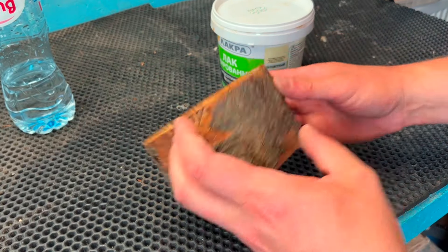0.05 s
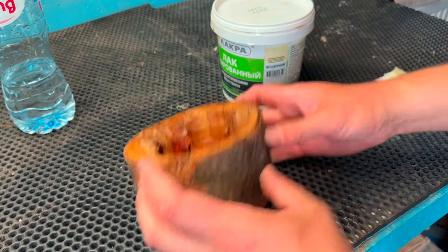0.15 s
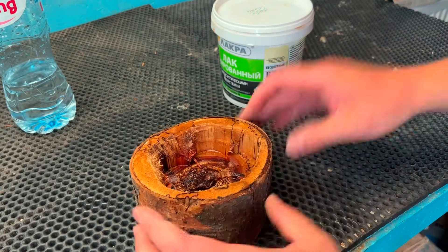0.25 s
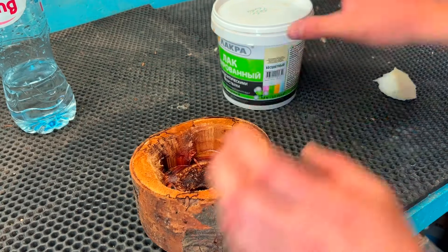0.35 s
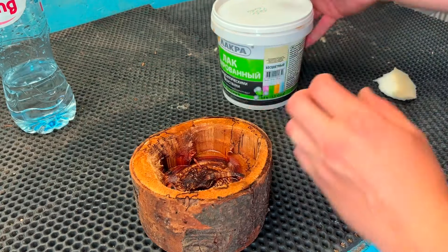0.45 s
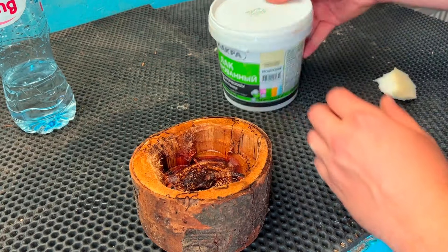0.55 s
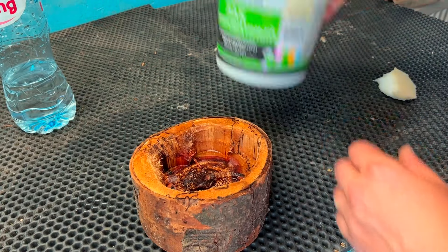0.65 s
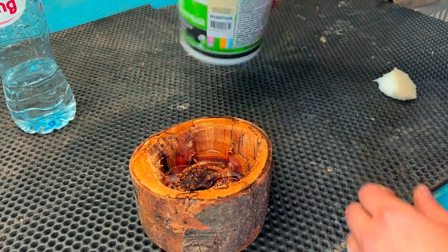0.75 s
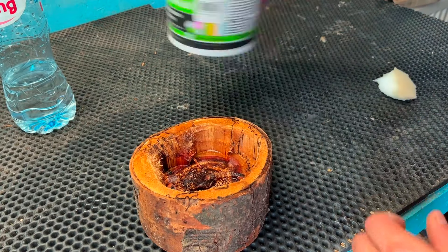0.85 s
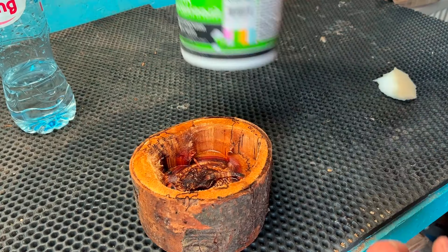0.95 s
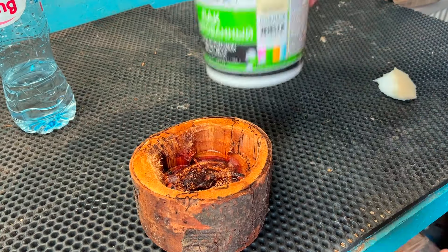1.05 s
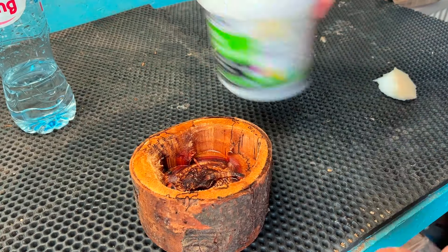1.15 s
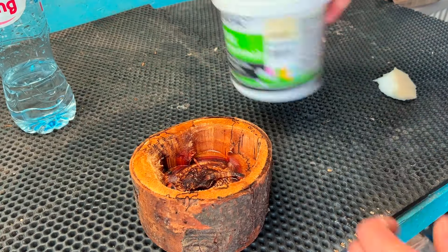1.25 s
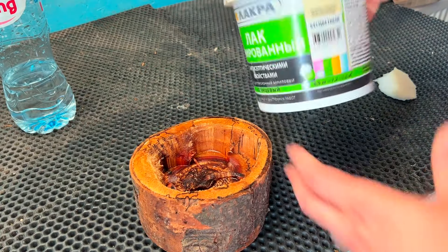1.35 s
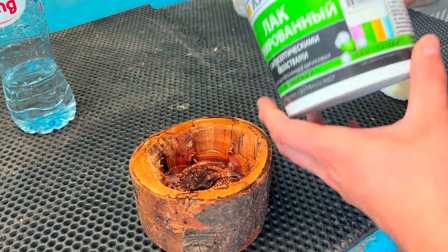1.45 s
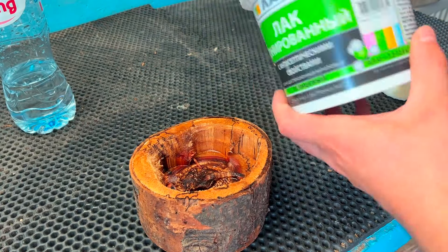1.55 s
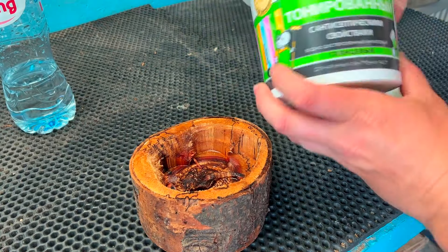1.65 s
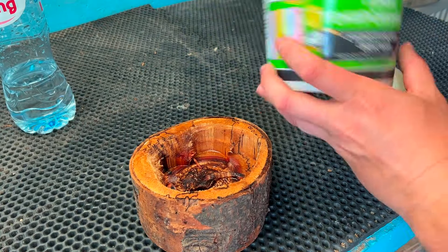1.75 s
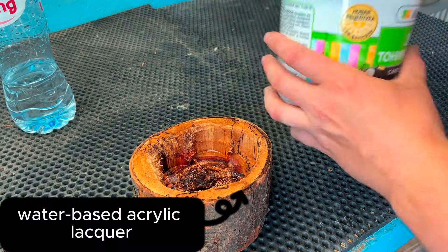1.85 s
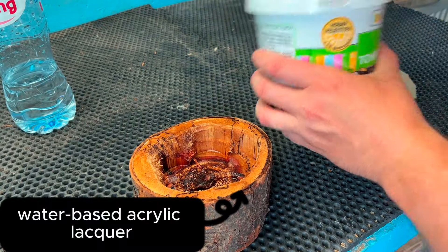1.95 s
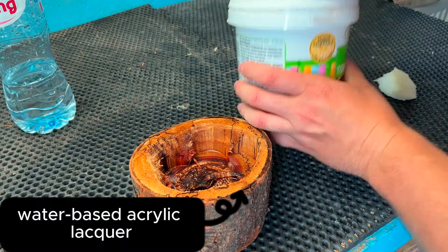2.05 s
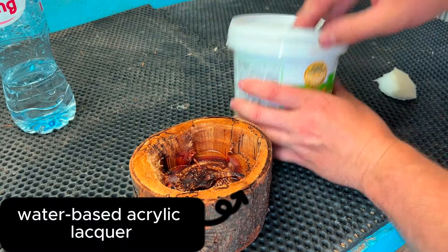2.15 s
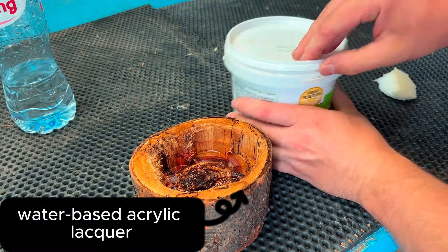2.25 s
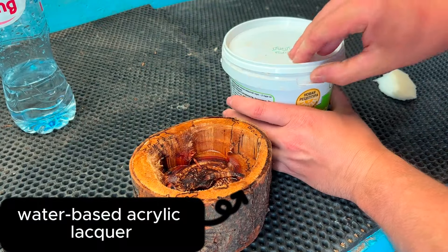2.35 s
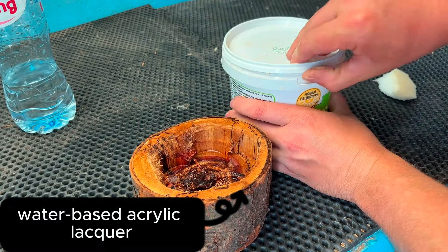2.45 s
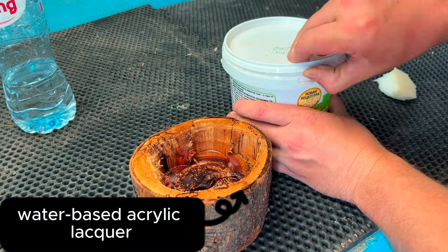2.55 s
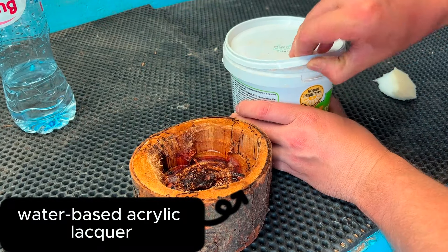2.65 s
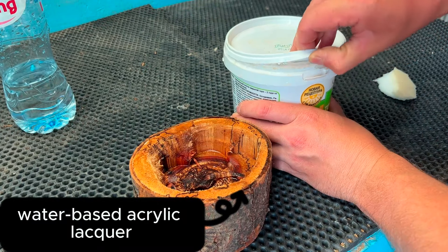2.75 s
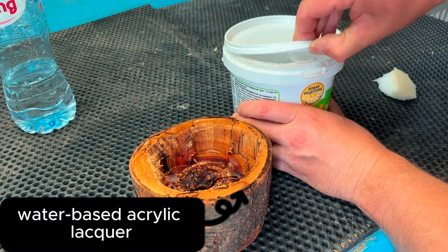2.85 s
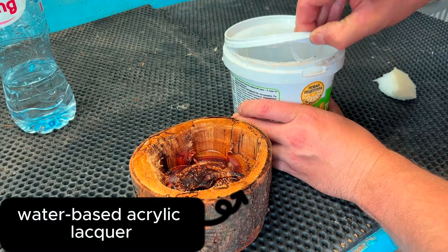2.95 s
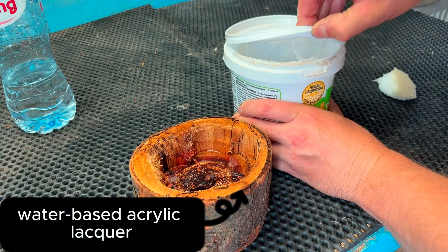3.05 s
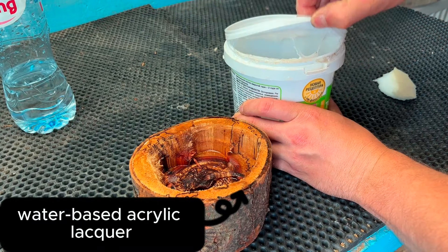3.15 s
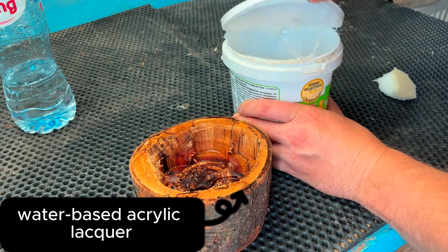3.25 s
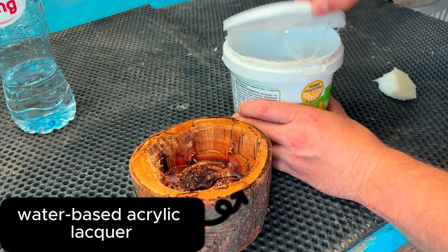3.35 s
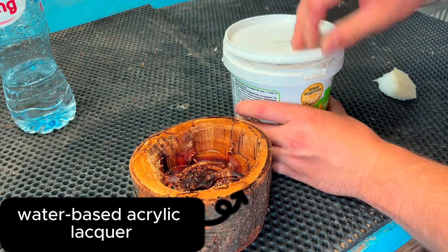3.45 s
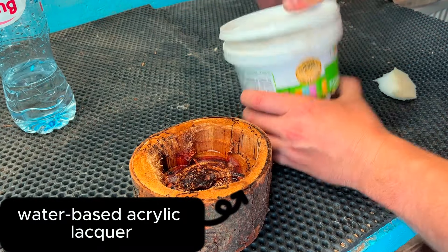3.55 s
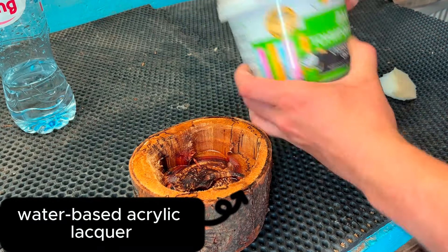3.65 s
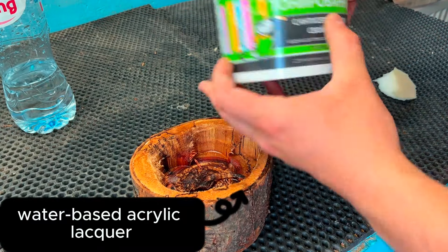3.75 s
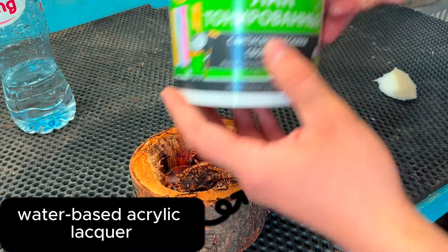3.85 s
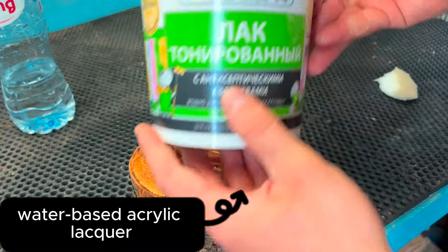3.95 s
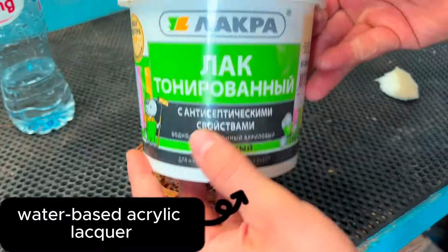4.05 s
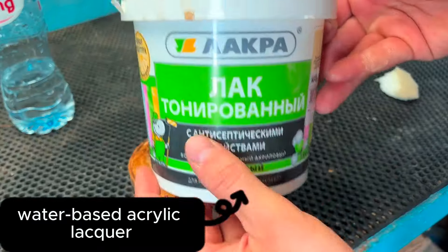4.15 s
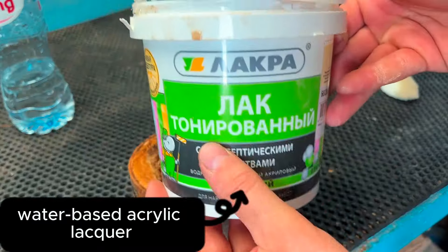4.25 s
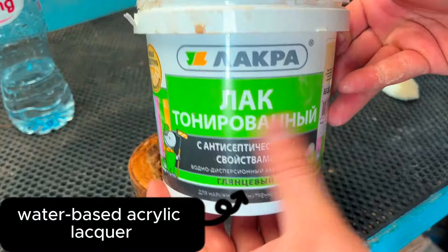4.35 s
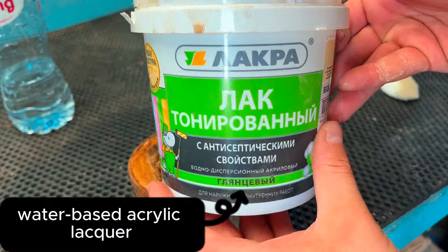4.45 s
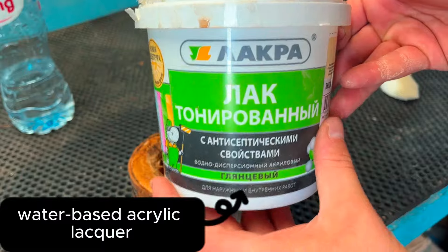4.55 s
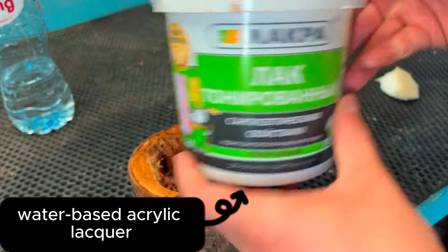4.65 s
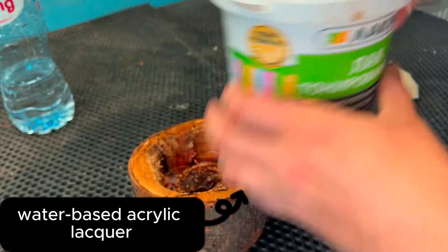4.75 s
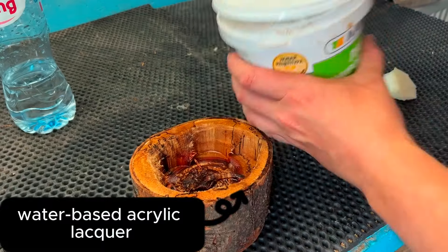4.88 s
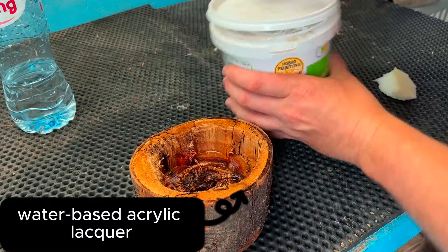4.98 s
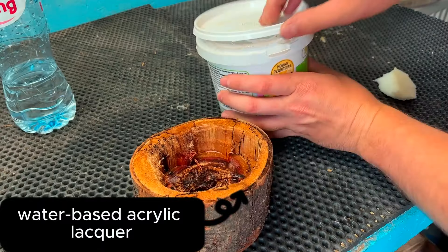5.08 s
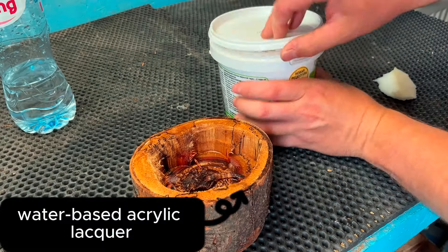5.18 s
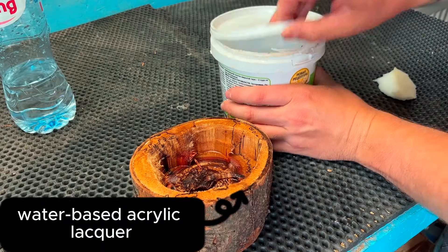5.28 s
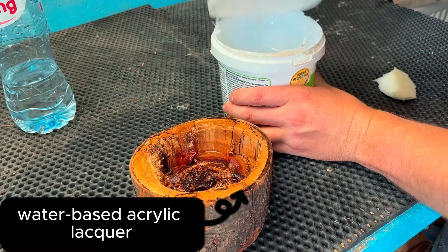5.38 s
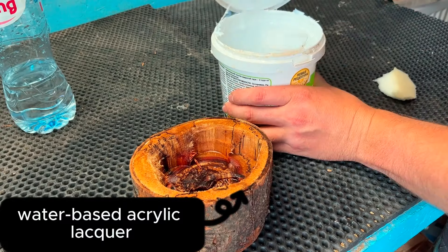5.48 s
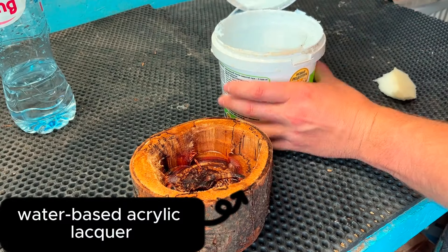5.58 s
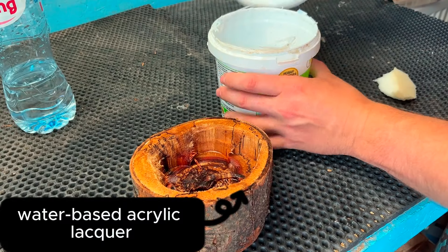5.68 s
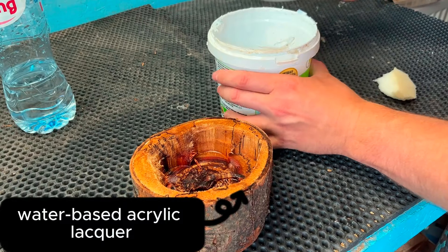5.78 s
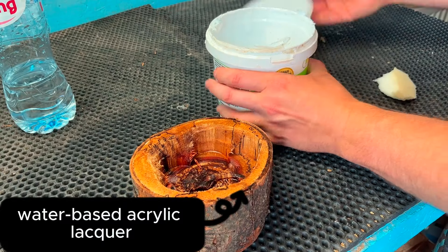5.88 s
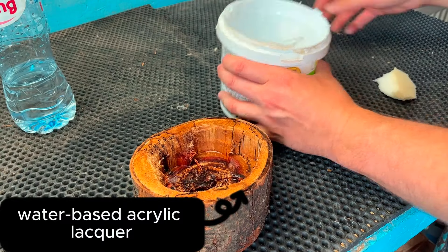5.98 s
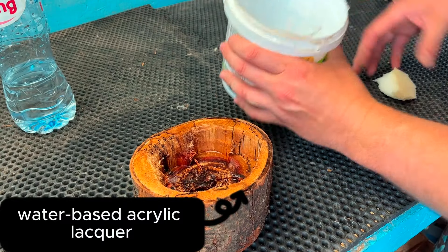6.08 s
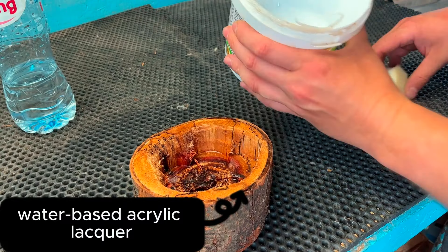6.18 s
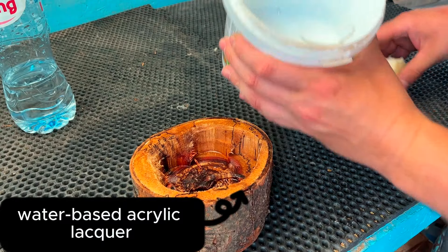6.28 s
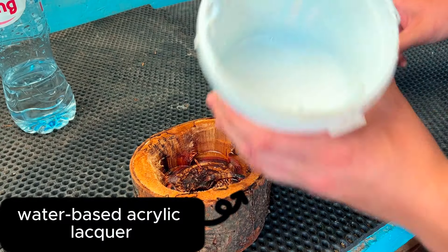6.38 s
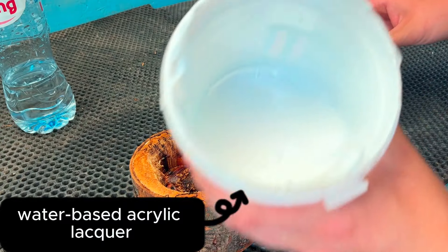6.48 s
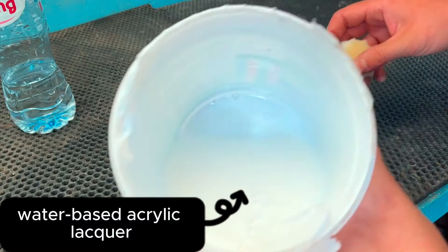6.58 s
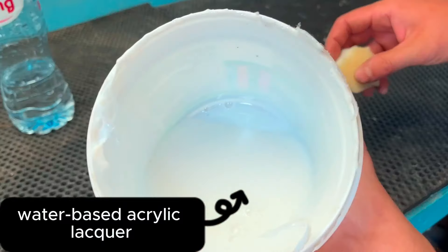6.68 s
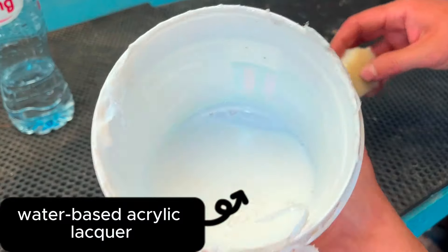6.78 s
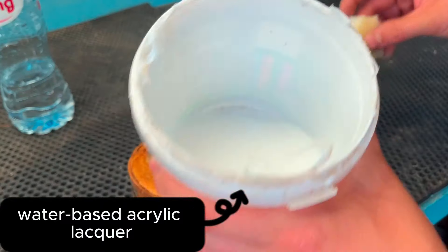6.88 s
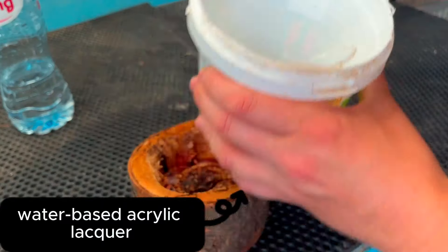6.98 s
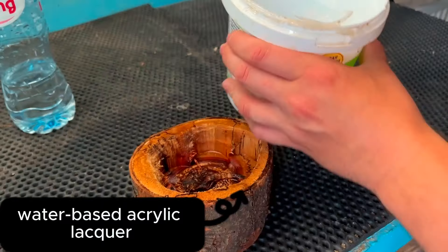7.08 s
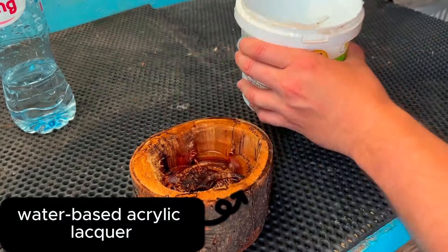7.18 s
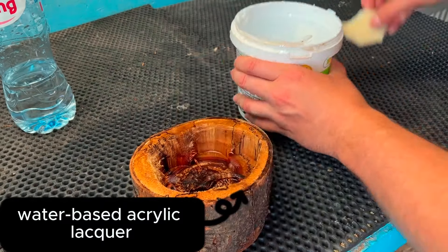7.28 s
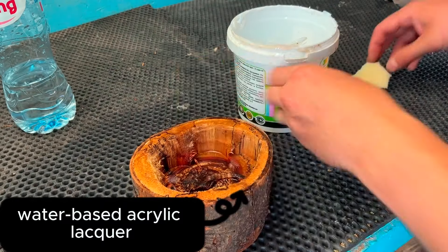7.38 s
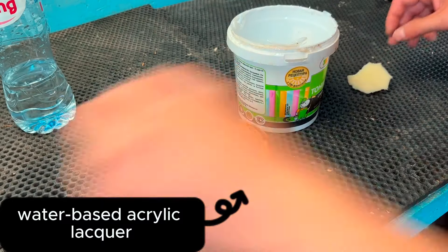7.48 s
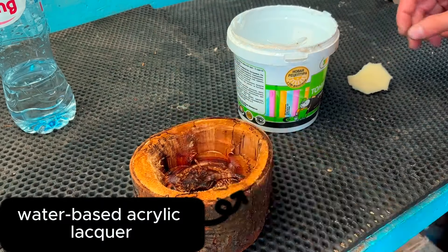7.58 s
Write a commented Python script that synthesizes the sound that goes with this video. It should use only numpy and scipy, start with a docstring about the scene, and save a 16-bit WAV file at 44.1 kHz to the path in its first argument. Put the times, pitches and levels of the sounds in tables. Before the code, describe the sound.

Hands handle a plastic tub and pry off its lid, with sharp snaps, hollow pops, soft thuds and rubbing fingers.

```python
"""A plastic tub is lifted and turned, its lid pried and peeled off, and it is stood on a rubber mat.
First, hands set down a wooden bowl on the bench. The tub's rim snaps and scrapes, the lid rings
like a small drum, the full tub thuds and fingers stick and slip on its wall.
A small workshop with a faint hum, heard close through two microphone ports."""
import sys
import numpy as np
from scipy import signal
from scipy.fft import rfft, irfft
from scipy.io import wavfile
from scipy.ndimage import map_coordinates

SR = 44100
rng = np.random.default_rng(int(sys.argv[2]) if len(sys.argv) > 2 else 0)


def transcribe(u):
    """Save the signal u as a 16-bit wav file named by the first command-line argument.

    u: samples, shape (n,) or (channels, n), limited to [-1, 1]; the rate is SR.
    q: integer samples, one column per channel.
    """
    v = np.clip(np.atleast_2d(u).T, -1, 1)
    q = np.round(v * 32767).astype(np.int16)
    wavfile.write(sys.argv[1], SR, q)


N = 336042
TIME = np.arange(N) / SR

TICK, SNAP, TEAR = .0009, .0024, .0045  # release times [s]
# contacts: (scuff [dB], fizz [dB], hollow [dB], swish [dB])
SKIN = (-1, -8.5, -9.5, -24)
PALM = (0.75, -29, -12.5, -4)
RIM = (-6.5, -0.5, -11.5, -20)
WALL = (-36, -30, 2, -10.5)
SLIDE = (-17, -8.5, -42, -1)
# spectra of soft skin, hard edge, tub wall and long slide: (frequency [Hz], level [dB])
SCUFF = [(300, -25), (1200, -3.5), (2600, 0), (4000, -1), (6200, -2), (8500, -6), (11500, -6), (13500, -8),
         (15800, -20.5)]
FIZZ = [(1000, -27.5), (6000, -5), (10000, 1), (12400, -5), (13800, -3), (15800, -16)]
HOLLOW = [(80, -5.5), (300, 6.5), (480, -0.5), (620, -1.5), (800, -0.5), (1300, -2), (1650, -5.5),
          (2050, -4), (2800, -7), (4500, -17), (12000, -44)]
SWISH = [(300, -21.5), (850, -13.5), (1300, 0.5), (2100, -3.5), (3300, 0.5), (6000, -3), (8500, -8),
         (11500, -11.5), (15800, -30)]


def amp(db):
    """Decibels to gain."""
    return 10 ** (np.asarray(db) / 20)


def unit(x):
    """Scale to rms 1."""
    return x / np.sqrt(np.mean(x ** 2) + 1e-20)


def log_interp(points, hz):
    """Interpolate on a log-frequency axis."""
    f, value = np.transpose(points)
    return np.interp(np.log(hz + 1), np.log(f + 1), value)


def add(track, at_s, sound):
    """Mix a sound in at at_s."""
    part = track[max(round(at_s * SR), 0):][:len(sound)]
    part += sound[:len(part)]


def colour(x, spectrum, size=4096):
    """Minimum-phase filter of unit energy."""
    log_gain = np.log(amp(log_interp(spectrum, abs(np.fft.fftfreq(size, 1 / SR)))))
    response = np.exp(np.conj(signal.hilbert(log_gain)))
    taps = np.fft.ifft(response).real[:size // 2]
    return signal.oaconvolve(x, taps / np.linalg.norm(taps))[:N]


def waver(spread_db, per_s):
    """Random gain gliding through per_s values a second."""
    knots_s = TIME[::SR // per_s]
    return amp(spread_db * np.interp(TIME, knots_s, rng.standard_normal(len(knots_s))))


def wander(x, spread_db, width_hz, hold_s):
    """Resonances come and go as moving fingers damp other spots of the wall."""
    frames = dict(fs=SR, nperseg=512, noverlap=384)
    hz, t, spectra = signal.stft(x, **frames)
    spots = np.array(np.meshgrid(hz / width_hz, t / hold_s, indexing="ij"))
    field = map_coordinates(rng.standard_normal((128, 512)), spots, order=1, mode="wrap")
    return signal.istft(spectra * unit(amp(spread_db * field)), **frames)[1][:N]


def slips(per_s, spread_db):
    """Stick-slip friction: random tiny impulses, a few much larger."""
    hits = np.flatnonzero(rng.random(N) < per_s / SR)
    size = np.minimum(rng.standard_exponential(N)[hits], 4)
    train = np.zeros(N)
    train[hits] = amp(spread_db * size) * np.sign(rng.random(N)[hits] - .5)
    return unit(train)


def ring(hz, t60_s, rise_s, sag=0):
    """Damped mode with a soft onset; pitch sags as the swing dies."""
    t = TIME[:SR // 2]
    swing = amp(-60 * t / t60_s)
    cycles = np.cumsum(hz * (1 + sag * (swing - .5))) / SR
    return 2 * np.sin(2 * np.pi * cycles) * swing * (1 - np.exp(-(t / rise_s) ** 2))


def shudder(hz, decay_s, rel_width, rise_s=0.0032):
    """Brief rattling contact through one broad resonance."""
    t = TIME[:SR // 3]
    edge = 1 + rel_width / 2
    band = signal.butter(2, [hz / edge, hz * edge], "band", fs=SR)
    rattle = rng.standard_normal(len(t)) * np.exp(-t / decay_s) * (1 - np.exp(-t / rise_s))
    shiver = signal.lfilter(*band, rattle)
    return shiver * np.sqrt(decay_s * SR) / np.linalg.norm(shiver)


def background(air_db=-67.5):
    """Still workshop air and a faint machine hum."""
    # air noise: (frequency [Hz], level [dB])
    air = [(15, -55), (25, -3.5), (76, -6), (102, -11.5), (137, -9.5), (166, -12.5), (363, -13.5),
           (394, -23.5), (1100, -30.5), (1480, -22), (1610, -17), (1800, -23.5), (2840, -39.5),
           (14800, -55), (16000, -60.5)]
    # hum tones: (frequency [Hz], relative level [dB])
    tones = [(140.0, -76), (301.5, -77.5), (403.7, -79), (1630, -91)]
    shared, left, right = (colour(rng.standard_normal(N), air) for _ in range(3))
    hum = sum(amp(db - 2) * np.sin(2 * np.pi * (hz * TIME + rng.random())) for hz, db in tones)
    return amp(air_db) * (shared + np.array([left, right])) + hum


def scrapes(swell_share=0.41, trail_db=-24, trail_s=.045):
    """Strokes over plastic or mat: slips swell, fade and trail off, coloured by the contact."""
    # (peak time [s], level [dB], length [s], contact [4 x dB])
    strokes = [(0.134, -66.5, 0.046, RIM), (0.233, -46, 0.027, SKIN), (0.28, -53.5, 0.027, SKIN),
               (0.5, -49.5, 0.023, SKIN), (0.593, -55.5, 0.074, SKIN), (0.698, -51.5, 0.017, RIM),
               (0.75, -44.5, 0.032, RIM), (0.86, -46, 0.027, WALL), (1.128, -45, .018, WALL),
               (1.256, -39, 0.02, WALL), (1.333, -47.5, 0.053, WALL), (1.419, -44, 0.015, SKIN),
               (1.465, -67, 0.028, PALM), (1.643, -44.5, 0.025, SKIN), (1.715, -56.5, 0.041, SKIN),
               (1.783, -64, 0.052, SKIN), (1.916, -59, .014, RIM), (1.96, -52, 0.016, PALM),
               (2.048, -58, 0.019, PALM), (2.124, -52.5, 0.031, WALL), (2.167, -53, 0.014, SKIN),
               (2.232, -44.5, 0.022, SKIN), (2.305, -49, 0.015, PALM), (2.54, -43, 0.03, RIM),
               (2.672, -32.5, 0.025, RIM), (2.845, -54.5, 0.014, RIM), (2.927, -34, 0.021, RIM),
               (2.989, -49.5, .025, RIM), (3.123, -48.5, 0.018, RIM), (3.197, -39.5, 0.022, RIM),
               (3.249, -28.5, 0.046, SKIN), (3.323, -36, 0.017, RIM), (3.57, -59, 0.022, PALM),
               (3.654, -49.5, 0.022, SKIN), (3.704, -61, 0.097, PALM), (4.143, -71, 0.053, PALM),
               (4.411, -56, 0.056, RIM), (4.69, -61.5, 0.076, PALM), (4.762, -61, 0.06, PALM),
               (4.871, -62, 0.033, SKIN), (4.937, -53, 0.027, SKIN), (5.277, -54, 0.028, SKIN),
               (5.353, -63, 0.018, SKIN), (5.436, -42.5, 0.032, SKIN), (5.483, -36.5, 0.015, SKIN),
               (5.639, -47, 0.035, RIM), (5.727, -55, 0.02, PALM), (5.925, -68, 0.16, SKIN),
               (6.009, -49, 0.067, WALL), (6.223, -49, 0.036, PALM), (6.279, -48, 0.11, SLIDE),
               (6.5, -74, .05, SKIN), (6.913, -68.5, 0.035, SKIN), (7.067, -67, 0.041, PALM),
               (7.395, -63.5, 0.091, SKIN)]
    forces = np.zeros((4, N))
    for peak_s, db, length_s, contact in strokes:
        span = abs(TIME - peak_s) < .4
        t = TIME[span] - peak_s
        slope_s = length_s * np.where(t < 0, swell_share, 1 - swell_share)
        stroke = np.exp(-abs(t / slope_s) ** 1.294)
        trail = (t > 0) * amp(trail_db) * np.exp(-abs(t) / trail_s)
        forces[:, span] += amp(db) * np.outer(amp(contact), np.maximum(stroke, trail))
    forces *= waver(1.5, per_s=250)  # chatter
    return sum(colour(slips(per_s=12000, spread_db=3.5) * force, spectrum)
               for force, spectrum in zip(forces, (SCUFF, FIZZ, HOLLOW, SWISH)))


def thuds(lead_s=0.03, rumble_rise_s=0.009, rumble_fade_s=0.026, cushion_s=0.0032):
    """Bowl, tub or palm lands: an edge sets the bench rumbling, then the mat cushions the blow."""
    # (time [s], level [dB], pitch [Hz], rumble [dB], wall ring [Hz], wall ring [dB])
    blows = [(0.235, -32, 78, -35, 342, -46.5), (.282, -32.5, 103, -37.5, 331, -52),
             (.573, -54, 179, -46, 336, -55), (1.769, -36.5, 278, -49.5, 387, -54.5),
             (2.119, -32, 286, -40.5, 399, -45.5), (2.138, -34, 158, -49, 290, -51),
             (2.228, -30.5, 135, -41, 300, -49.5), (3.229, -33, 153, -55, 272, -37),
             (3.655, -44, 131, -53, 300, -60), (3.77, -33.5, 163.7, -35.5, 320.4, -44.5),
             (5.175, -27.5, 140, -39, 330, -45.5), (5.744, -40.5, 134.5, -68.5, 297, -72.5),
             (5.969, -23, 140.6, -44.5, 316, -38), (6.02, -39, 150, -56, 340, -51),
             (7.368, -30, 165, -40, 270, -43)]
    # bench rumble: (frequency [Hz], level [dB])
    bench = [(15, -14.5), (45, -1), (90, -1), (150, 3.5), (230, -9), (420, -8.5), (620, -29), (1500, -38),
             (5000, -80.5)]
    t = TIME[:SR // 2] - lead_s
    swell = np.exp(-abs(t) / np.where(t < 0, rumble_rise_s, rumble_fade_s))
    body, shake = np.zeros((2, N))
    heaviest_db = max(row[3] for row in blows)
    for at_s, db, hz, rumble_db, wall_hz, wall_db in blows:
        add(body, at_s, amp(db + 4) * ring(hz, t60_s=0.08, rise_s=cushion_s, sag=0.097))
        add(body, at_s, amp(wall_db + 7.5) * ring(wall_hz, t60_s=0.081, rise_s=cushion_s))
        sway_db = -35.5 + 1.8 * (rumble_db - heaviest_db)  # light blows hardly sway the bench
        add(body, at_s, amp(sway_db) * ring(hz=52.4, t60_s=0.35, rise_s=0.011))
        add(shake, at_s - lead_s, amp(rumble_db + 4) * swell)
    return body + colour(shake * rng.standard_normal(N), bench)


def snaps(clack_decay_s=0.0044, tail_db=-21, tail_s=0.026, rise_share=0.29):
    """Plastic lets go: a spike, then a shiver of the wall's dense, well damped modes."""
    # (time [s], bright crack [dB], hollow clack [dB], release [s])
    releases = [(.289, -46.5, -60, TICK), (.568, -43.5, -38, SNAP), (.583, -43.5, -46.5, TICK),
                (0.665, -42.5, -70, TICK), (.724, -37, -67, TICK), (.887, -49.5, -33.5, SNAP),
                (.93, -41.5, -54, TEAR), (.986, -46, -38, SNAP), (1.056, -49, -55, TICK),
                (1.098, -47, -45.5, SNAP), (1.125, -45, -39.5, TEAR), (1.176, -36, -64, TICK),
                (1.219, -46, -37.5, TEAR), (1.26, -34, -40, SNAP), (1.295, -45, -51, SNAP),
                (2.234, -38, -53, TICK), (2.317, -42, -52.5, TICK), (2.533, -34.5, -56.5, TEAR),
                (2.669, -30, -46, SNAP), (2.754, -31, -50, TICK), (2.763, -33.5, -51, TICK),
                (2.894, -47, -58, SNAP), (2.963, -38, -48, SNAP), (3.047, -37, -47, TEAR),
                (3.066, -39.5, -56, SNAP), (3.194, -43, -45.5, SNAP), (3.220, -16.5, -22, SNAP),
                (3.237, -24, -35.5, TEAR), (3.25, -21, -34.5, TEAR), (3.302, -22.5, -40, SNAP),
                (3.312, -25.5, -45.5, SNAP), (3.322, -28.5, -49, TICK), (3.4, -45, -52.5, SNAP),
                (3.448, -41.5, -43, SNAP), (3.525, -41, -42.5, TICK), (3.621, -75, -47, SNAP),
                (4.974, -49, -49.5, SNAP), (5.167, -51, -45, SNAP), (5.407, -34, -36, SNAP),
                (5.425, -32, -37, SNAP), (5.436, -27.5, -38, TEAR), (5.451, -39, -44, TEAR),
                (5.482, -26.5, -49, TEAR), (5.535, -43, -48.5, TEAR), (5.602, -48, -45.5, SNAP),
                (5.737, -38, -40.5, SNAP), (5.968, -49, -40, SNAP), (6.003, -47.5, -35, SNAP),
                (6.019, -58, -31, TICK), (7.363, -59, -46, SNAP), (7.447, -53, -54.5, SNAP)]
    # (frequency [Hz], level [dB])
    crack_spectrum = [(300, -29), (1200, -20.5), (2600, -9), (3800, -2.5), (6000, 1.5), (8500, -1),
                      (10500, 0), (12200, 0), (13500, -2.5), (15800, -11.5)]
    t = TIME[:SR // 5]
    tail = amp(tail_db) * np.exp(-t / tail_s)
    crack, clack = np.zeros((2, N))
    for at_s, crack_db, clack_db, release_s in releases:
        decay_s = np.array([[release_s], [clack_decay_s]])
        shiver = rng.standard_normal((2, len(t))) * (np.exp(-t / decay_s) + tail)
        shiver *= 1 - np.exp(-t / (rise_share * decay_s))
        shiver[:, SR // 1400] += 0.0051 / decay_s[:, 0]  # spike, taller for a quick release
        add(crack, at_s, amp(crack_db + 1.5) * shiver[0])
        add(clack, at_s, amp(clack_db + 4) * shiver[1])
    return colour(crack, crack_spectrum) + colour(clack, HOLLOW)


def lid_pops(buzz_db=-12):
    """The flexed lid pops over the air in the tub and buzzes against the rim."""
    # higher the further the lid is bent: (time [s], level [dB], pitch [Hz])
    pops = [(.568, -50, 415), (.583, -44.5, 341), (0.858, -37.5, 380), (0.888, -43, 440),
            (1.098, -47.5, 484), (1.221, -48, 366), (2.668, -42, 328), (2.831, -45.5, 296),
            (2.856, -40.5, 295), (2.898, -39, 345), (2.921, -35, 362), (2.965, -34, 361),
            (2.99, -39.5, 364), (3.003, -40, 382), (3.049, -36.5, 394), (3.197, -30.5, 484),
            (3.221, -21, 434), (3.238, -31.5, 400), (3.249, -27, 480), (3.274, -36.5, 511),
            (3.302, -38.5, 556), (3.4, -49.5, 471), (3.448, -42, 490), (3.468, -42, 395),
            (3.489, -41.5, 324), (3.528, -38.5, 375), (3.622, -37, 404.6), (3.646, -43.5, 392),
            (3.668, -42.5, 406), (3.726, -49, 397), (4.762, -53, 402), (4.96, -52.5, 386),
            (5.102, -44, 397), (5.28, -48.5, 363), (5.399, -46, 490), (5.409, -28.5, 515),
            (5.425, -33.5, 537), (5.435, -27.5, 476), (5.452, -34.5, 584), (5.481, -36, 706),
            (5.491, -41, 709), (5.484, -37.5, 317.6)]
    # (frequency / pitch, level [dB])
    modes = [(1, 3), (.6, -14.5), (1.47, -20.5), (2.15, -23.5)]
    out = np.zeros(N)
    for at_s, db, hz in pops:
        for ratio, mode_db in modes:
            mode_hz = hz * ratio * rng.uniform(0.95, 1.015)
            add(out, at_s, amp(db + mode_db) * ring(mode_hz, t60_s=0.053, rise_s=0.0028, sag=0.035))
        add(out, at_s, amp(db + buzz_db) * shudder(hz, decay_s=0.01567, rel_width=0.24))
    return out


def grip():
    """Skin creeps over the tub: dull spurts, a steadier hiss, creaks where it sticks."""
    # (start [s], length [s], dull rub [dB], hiss [dB], crackle [dB])
    holds = [(0.7, 0.73, -54, -63.5, -55), (1.561, 1.02, -66, -66.5, -83), (2.586, 0.63, -62.5, -64, -71),
             (3.314, 0.602, -65.5, -66, -77), (3.897, 0.39, -75, -77, -80.5),
             (4.82, 0.79, -63.5, -62.5, -78), (5.514, 0.3, -68.5, -67, -58.5),
             (6.425, 1.9, -92.5, -84.5, -89)]
    # (frequency [Hz], level [dB])
    rub_spectrum = [(40, -12.5), (140, 7.5), (380, 10.5), (520, 2.5), (650, -3), (1100, -1.5), (2000, -6),
                    (3200, -12), (7000, -40)]
    rub, hiss, stick = np.zeros((3, N))
    for start_s, length_s, rub_db, hiss_db, crackle_db in holds:
        press = np.sqrt(np.sin(np.pi * np.arange(0, length_s, 1 / SR) / length_s))
        add(rub, start_s, amp(rub_db) * press)
        add(hiss, start_s, amp(hiss_db - 1) * press)
        add(stick, start_s, amp(crackle_db - 3.5) * press)
    dull = slips(per_s=4300, spread_db=2.5) * rub * waver(4.5, per_s=50)
    fine = slips(per_s=12000, spread_db=3.5) * hiss * waver(4, per_s=25)
    ticks = slips(per_s=60, spread_db=2) * hiss * amp(-12)
    crackles = slips(per_s=170, spread_db=4) * stick * waver(2.8, per_s=25)
    creaks = wander(colour(crackles, SWISH), spread_db=7, width_hz=260, hold_s=.025)
    return colour(dull, rub_spectrum) + colour(fine, SCUFF) + colour(ticks, FIZZ) + creaks


def knocks(after_ring_db=-30.5):
    """Tub and loose lid knock at the resonance of the struck spot, with a faint after-ring."""
    # (time [s], level [dB], resonance [Hz], decay [s])
    strikes = [(0.886, -38.5, 3150, 0.0025), (.89, -57, 890, 0.0046), (0.987, -50, 2030, 0.0015),
               (1.078, -43.5, 3060, 0.0024), (1.125, -37.5, 2020, 0.0035), (1.265, -26, 1060, 0.0035),
               (1.267, -28.5, 1760, 0.0027), (1.335, -43, 1210, 0.0039), (1.35, -44, 1510, 0.0052),
               (1.372, -48.5, 2280, 0.0046), (1.402, -41.5, 1170, 0.0026), (1.65, -40.5, 5100, 0.0016),
               (1.961, -48.5, 4850, 0.0054), (2.122, -39, 715, 0.0021), (2.312, -35, 6760, 0.0026),
               (3.2205, -24.5, 1050, .0022), (3.25, -32.5, 720, 0.0095), (3.323, -36.5, 4500, 0.004),
               (4.974, -45, 5000, 0.0051), (5.44, -32, 653, 0.0022), (5.483, -31.5, 5360, 0.0026),
               (5.481, -39.5, 2050, 0.0078), (5.532, -42.5, 2160, 0.004), (5.623, -43, 2080, 0.0082),
               (5.736, -36.5, 2150, 0.0016), (5.967, -31, 1310, 0.0011), (5.969, -35, 418, 0.0025),
               (6.002, -31, 1350, 0.0029), (6.004, -39, 764, 0.01), (6.0197, -19, 1326, 0.00072),
               (6.019, -29.5, 2330, .001), (6.053, -44, 1330, 0.0075), (7.362, -38.5, 785, 0.0018)]
    out = np.zeros(N)
    for at_s, db, hz, decay_s in strikes:
        add(out, at_s, amp(db) * shudder(hz, decay_s, rel_width=0.19, rise_s=0.65 * decay_s))
        add(out, at_s, amp(db + after_ring_db) * shudder(hz, decay_s=.035, rel_width=0.3))
    return out


def tub_ring():
    """The rim comes free and leaves the whole tub ringing faintly."""
    # (time [s], level [dB])
    releases = [(3.222, -46.5), (5.44, -60.5)]
    # (frequency [Hz], level [dB], t60 [s])
    modes = [(480, 9.5, 0.27), (544, 10.5, 0.17), (684, -4.5, .35), (1200, -11, .6), (1485, -13, .4),
             (1915, 5.5, .24), (3820, -1, .22), (4506, -3, .24)]
    out = np.zeros(N)
    for at_s, db in releases:
        for hz, mode_db, t60_s in modes:
            add(out, at_s, amp(db + mode_db) * ring(hz, t60_s, rise_s=0.0019))
    return out


def reflections(x, start_s, t60_curve):
    """Sparse echoes of random sign for each port; each band dies at its own rate."""
    step = SR // 4000
    length = round((start_s + np.max(np.transpose(t60_curve)[1])) * SR)
    slots = np.arange(round(start_s * SR), length, step)
    arrivals = slots + rng.integers(0, step, (2, len(slots)))
    taps = np.zeros((2, length + step))
    np.put_along_axis(taps, arrivals, rng.choice([-1., 1.], arrivals.shape), 1)
    hz, t, spectra = signal.stft(taps, SR, nperseg=256)
    fade = amp(-60 * t / log_interp(t60_curve, hz)[:, None])
    tail = signal.istft(spectra * fade, SR)[1]
    tail /= np.linalg.norm(tail, axis=1, keepdims=True)
    return signal.oaconvolve(x[None], tail, axes=1)[:, :N]


def workshop(x, near_db, room_db, patterns=3, turn_s=.11, near_t60_s=0.03):
    """Direct sound, room tail, and near scatter that changes as hands and tub move."""
    # (frequency [Hz], t60 [s])
    room_decay = [(100, 0.66), (400, 0.21), (1500, 0.14), (4000, 0.1), (9000, 0.06), (15000, 0.092)]
    out = x + amp(room_db) * reflections(x, .008, room_decay)
    for k in range(patterns):  # scatter patterns crossfade in turn
        turns_away = (TIME / turn_s - k + patterns / 2) % patterns - patterns / 2
        weight = np.cos(np.pi / 2 * np.clip(turns_away, -1, 1))
        out += amp(near_db) * reflections(x * weight, .0004, [(1000, near_t60_s)])
    return out


def scene():
    """Clicks, friction and low rings on the bench, over the workshop air."""
    clicks = workshop(snaps() + knocks(), near_db=-6, room_db=-11) * amp(-0.03)
    rubbing = wander(scrapes() + grip(), spread_db=3, width_hz=600, hold_s=.035)
    friction = workshop(rubbing, near_db=-2.5, room_db=-6.5) * amp(-0.78)
    body = workshop(lid_pops() + tub_ring() + thuds(), near_db=-16.5, room_db=-22, patterns=2)
    return clicks + friction + body + background()


def record(dry, shared_below_hz=260, cutoff_hz=16000):
    """Two ports that share the bass and differ in level and phase, then a low-pass."""
    # left port over right: (frequency [Hz], phase lead [rad])
    phase_lead = [(0, 0), (400, -.3), (560, -.4), (680, 1.3), (1100, 1.1), (1900, -.1), (2900, 1),
                  (4500, .4), (5600, -1.4), (6600, -1.2), (8200, -3.1), (9300, -3.9), (11300, -6.1),
                  (12600, -6.4), (14000, -8), (15000, -9.4)]
    # left port over right: (frequency [Hz], level [dB])
    balance = [(40, 0), (100, 4.5), (180, 0), (300, -2.5), (450, -5), (600, 2), (850, -2), (1200, 1.5),
               (3000, 1.14)]
    hz = np.fft.rfftfreq(N, 1 / SR)
    lag = np.exp(-1j * np.interp(hz, *np.transpose(phase_lead)))
    lean = amp(log_interp(balance, hz) / 2)
    spectra = rfft(dry)
    mid = spectra.mean(0)
    side = (spectra - mid) * hz / np.hypot(hz, shared_below_hz)
    ports = irfft((mid + side) * np.array([lean, lag / lean]), N)
    lowpass = signal.firwin(511, cutoff_hz, window=("kaiser", 9), fs=SR)
    return signal.oaconvolve(ports, lowpass[None], "same")


dry = scene()
out = record(dry)
transcribe(out)
```